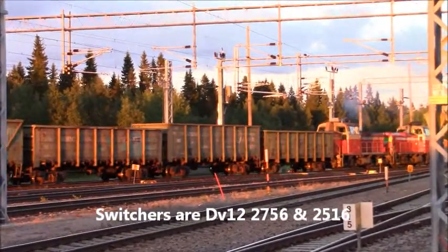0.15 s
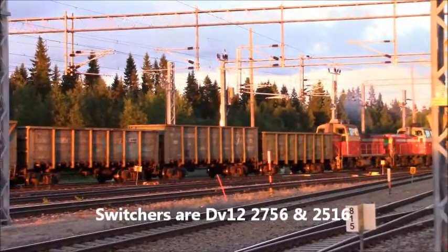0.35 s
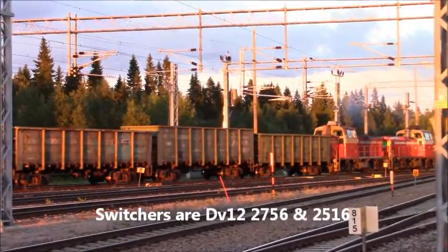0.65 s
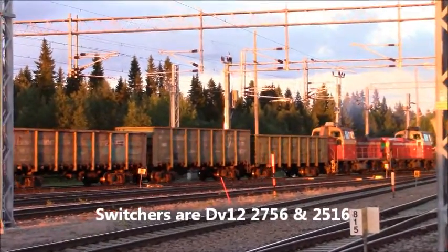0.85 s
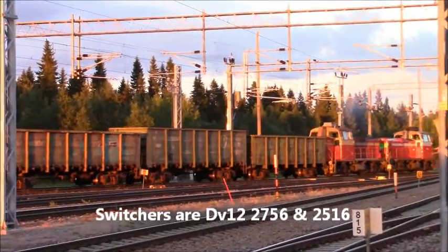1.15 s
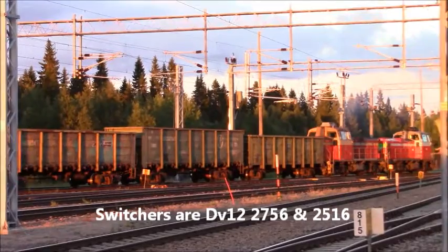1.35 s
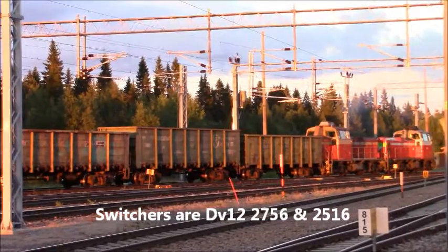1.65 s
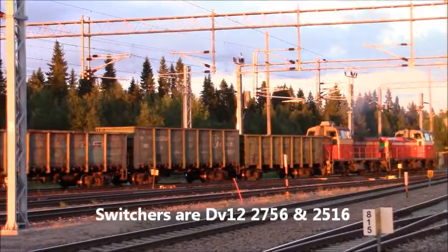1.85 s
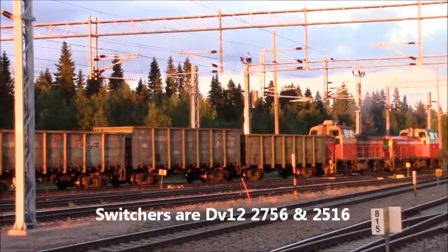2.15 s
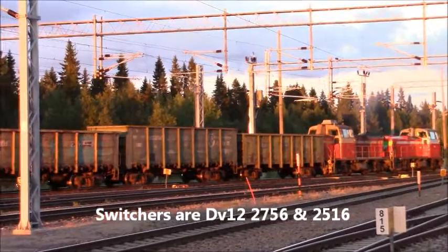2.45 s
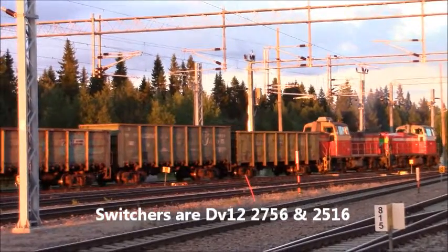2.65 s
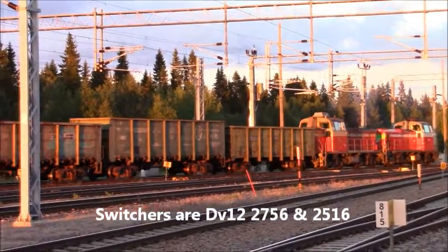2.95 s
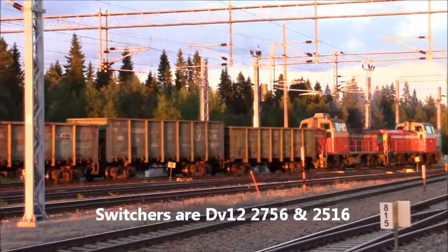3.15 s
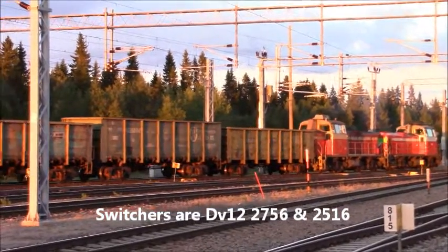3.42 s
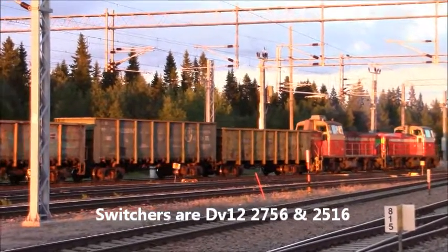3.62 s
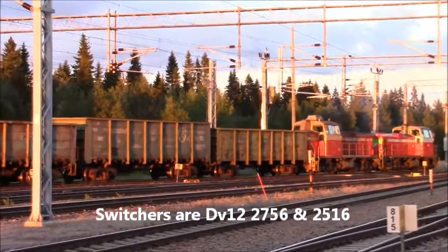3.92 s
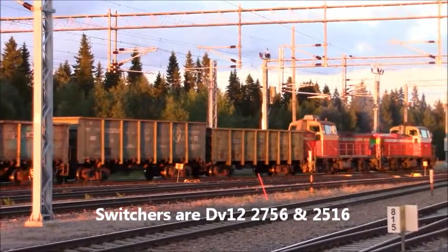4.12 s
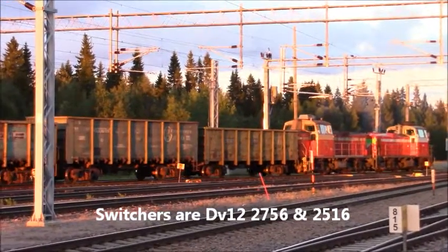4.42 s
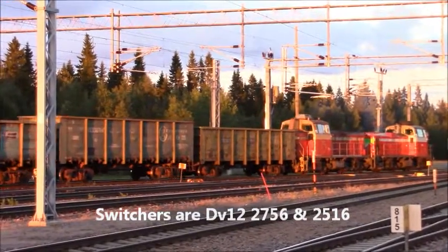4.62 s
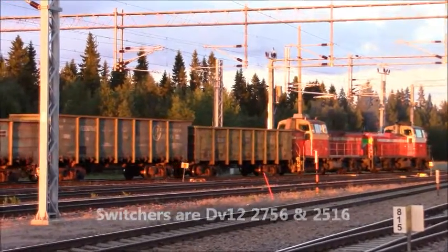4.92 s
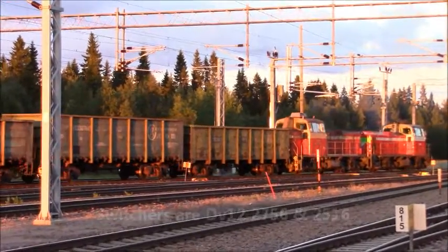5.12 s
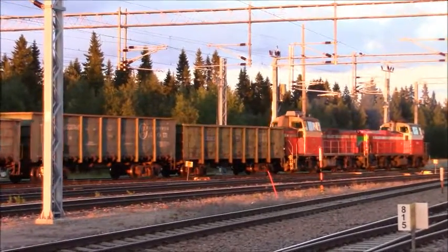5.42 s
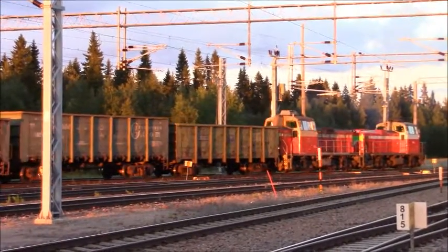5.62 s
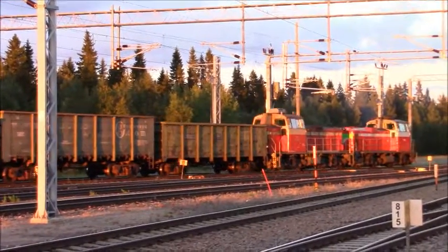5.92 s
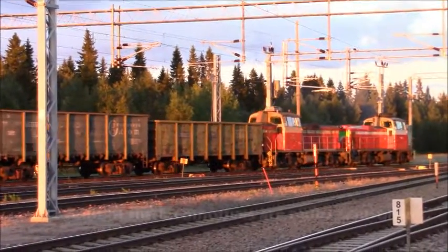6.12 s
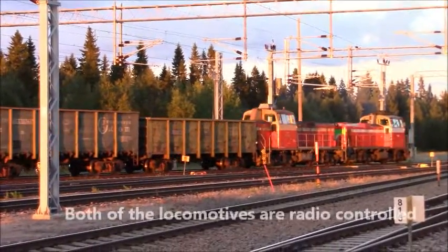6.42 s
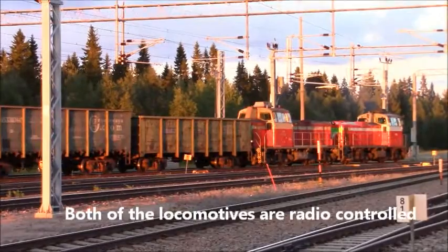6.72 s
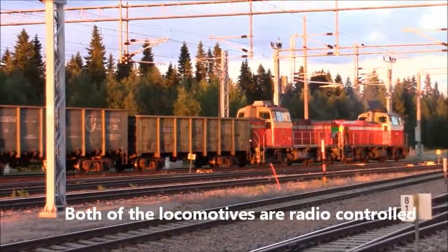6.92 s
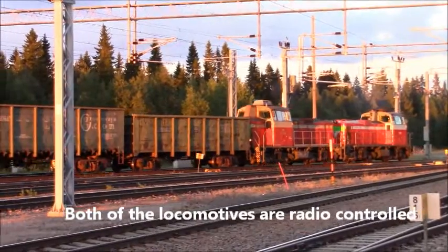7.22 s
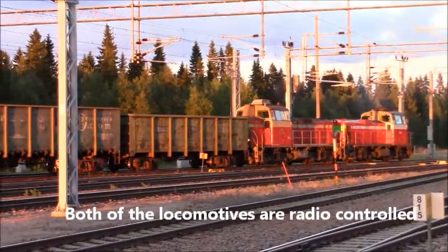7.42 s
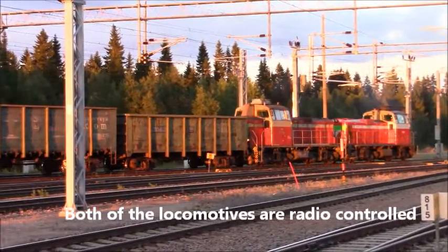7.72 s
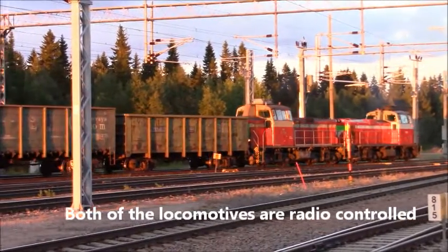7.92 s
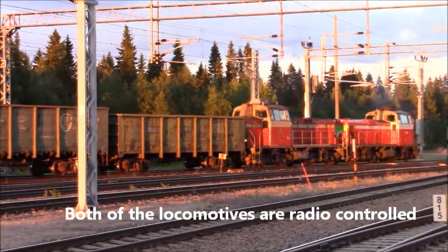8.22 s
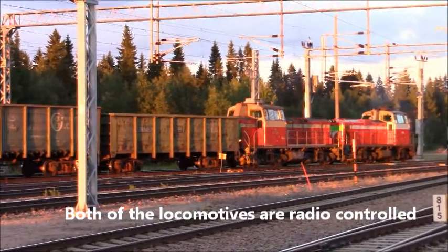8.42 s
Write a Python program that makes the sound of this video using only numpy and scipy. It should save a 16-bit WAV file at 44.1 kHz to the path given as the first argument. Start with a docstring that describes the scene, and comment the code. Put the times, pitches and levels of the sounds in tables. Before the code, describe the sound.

A slow freight train rumbles and clanks through a rail yard while its wheels sing long, piercing high squeals that push the rumble down.

```python
"""A rail yard: a slow freight train is pushed through the curves, with a diesel throbbing far off.
Coloured noise makes the wagons rumble and scrape; short noise bursts are their clanks and thuds.
Wheels creep sideways and sing as spread tones; one screeches in many modes, flanges ring and hiss.
A fast limiter pushes the rumble down whenever a squeal swells."""
import sys
import numpy as np
from scipy.fft import rfft, irfft, next_fast_len
from scipy.io import wavfile
from scipy.ndimage import uniform_filter1d, minimum_filter1d, map_coordinates

SR = 44100
rng = np.random.default_rng(int(sys.argv[2]) if len(sys.argv) > 2 else 0)


def master(y):
    """Save y as 16-bit WAV."""
    cut = np.clip(np.atleast_2d(y).T, -1, 1)
    pcm = np.round(cut * 32767)  # scale
    wavfile.write(sys.argv[1], SR, pcm.astype(np.int16))


N = 377496
TOP_HZ = 15600  # upper band limit

# noise colour of the wagon bodies: (frequency [Hz], density [dB per Hz])
RUMBLE_SPECTRUM = [(15, -69), (25, -36), (41, -23), (59, -5), (75, -4), (112, -9), (150, -4.5), (195, 2),
                   (280, -2.5), (350, -8), (450, -11.5), (600, -37.5), (1000, -100)]
# noise colour of the wheels: (frequency [Hz], density [dB per Hz])
ROAR_SPECTRUM = [(250, -16.5), (400, -7.5), (520, -1), (720, 2.5), (850, -1.5), (940, -1), (1100, -6),
                 (1400, -5.5), (1680, -3), (2100, -7.5), (2900, -7), (3600, -17), (4500, -50)]
# noise colour of the rails: (frequency [Hz], density [dB per Hz])
HISS_SPECTRUM = [(2500, -16), (3400, 5.5), (4000, 5.5), (4500, -1), (5500, -2), (7300, -2), (8500, -8.5),
                 (10000, -18), (13000, -30), (15500, -27.5)]


def amp(db):
    """Decibels to gain."""
    return 10 ** (np.asarray(db) / 20)


def unit(x):
    """Scale to rms 1."""
    return x / np.sqrt(np.mean(np.abs(x) ** 2) + 1e-20)


def along(points, hz):
    """Read (Hz, value) points on a log frequency axis."""
    f, v = np.transpose(points)
    return np.interp(np.log(hz + 1), np.log(f + 1), v)


def curves(rows, t):
    """Each column after the time, read at the times t."""
    s, *cols = np.transpose(rows)
    return [np.interp(t, s, c) for c in cols]


def span(start_s, end_s):
    """The sample times between two moments."""
    return np.arange(max(0, int(start_s * SR)), min(N, int(end_s * SR))) / SR


def add(out, t, x):
    """Mix x into out at the times t."""
    out[..., round(t[0] * SR):][..., :len(t)] += x


def wobble(t, rate_hz):
    """A random curve with rate_hz knots a second, joined by cubic splines."""
    knots = rng.standard_normal(int(N * rate_hz / SR) + 4)
    coarse = t[::32]
    return np.interp(t, coarse, map_coordinates(knots, [coarse * rate_hz], mode="nearest"))


def filtered(x, response):
    """Multiply the spectrum of x by a response of frequency."""
    m = next_fast_len(N + SR // 10, True)
    return irfft(rfft(x, m) * response(np.fft.rfftfreq(m, 1 / SR)), m)[..., :N]


def ports(pair, side_db):
    """Left and right: a shared signal plus and minus a second, weaker one."""
    mid, side = pair[0], amp(side_db) * pair[1]
    return np.array([mid + side, mid - side])


def rush(spectrum, side_db):
    """Stereo noise of rms 1 with the given colour."""
    noise = filtered(rng.standard_normal((2, N)), lambda hz: amp(along(spectrum, hz)))
    return unit(ports(noise, side_db))


def scatter(t, width_hz, steady):
    """Complex gain of a tone over many moving paths: a steady share of the power, the rest fading."""
    grid_hz = 4000
    age = t - t[0]
    hz = np.fft.fftfreq(2 ** int(np.ceil(np.log2((age[-1] + 1) * grid_hz))), 1 / grid_hz)
    line_shape = 1 / (1 + (hz / width_hz) ** 2) / np.sqrt(1 + (hz / (5.1 * width_hz)) ** 2)
    white = rng.standard_normal((2, len(hz), 2)) @ [1, 1j]
    paths = unit(np.fft.ifft(np.fft.fft(white) * line_shape))
    steady = np.clip(steady, 0, 1)
    gain = np.sqrt(steady) + np.sqrt(1 - steady) * ports(paths, side_db=-14)
    return np.array([np.interp(age * grid_hz, np.arange(len(hz)), g) for g in gain])


def tone(t, cycles, width_hz, steady):
    """A fading sine of nominal rms 1 that follows a running count of cycles."""
    return np.sqrt(2) * np.real(scatter(t, width_hz, steady) * np.exp(2j * np.pi * cycles))


def swell(t, rise_s, t60_s, hold_s=0, growth=1):
    """An envelope that grows as a power of time, holds, then decays exponentially."""
    age = t - t[0]
    ringing_s = np.maximum(age - rise_s - hold_s, 0)
    return np.minimum(age / rise_s, 1) ** growth * amp(-60 * ringing_s / t60_s)


def diesel():
    """The firing note of distant locomotives and its third harmonic, mono."""
    # (time [s], firing rate [Hz], level [dB])
    firing = [(0, 78.05, -40), (0.7, 75.34, -38.5), (1.3, 76.94, -49), (2.1, 71.7, -44), (2.6, 73.1, -54),
              (4.5, 67.83, -47), (8.56, 70.1, -52)]
    t = np.arange(N) / SR
    hz, db = curves(firing, t)
    cycles = np.cumsum(hz) / SR
    note = tone(t, cycles, width_hz=4, steady=0.89)
    third = tone(t, 3 * cycles, width_hz=6, steady=0.93)
    return amp(db) * (note + amp(-1) * third).mean(axis=0)


def rolling():
    """Rough treads shake wagon bodies, wheels and rails; treads scrubbing the rail lift roar and hiss."""
    # wagon rumble: (time [s], level [dB])
    roll = [(0, -28), (0.6, -34), (1.3, -33), (2.2, -34), (2.6, -31), (3.0, -36), (3.35, -32),
            (4.45, -30.5), (4.8, -35), (6.0, -32.5), (6.35, -37), (6.7, -33.5), (7.1, -38.5), (7.5, -31),
            (7.9, -33.5), (8.56, -38.5)]
    # scrubs, about two a second: (start [s], length [s], roar [dB], hiss [dB])
    scrapes = [(0.037, 0.91, -54, -47), (0.328, 0.24, -28, -47.5), (0.81, 0.25, -42.5, -47.5),
               (1.17, 0.29, -38, -45), (1.67, 0.37, -33.5, -43.5), (2.012, 0.2, -32, -42.5),
               (2.398, 0.44, -34.5, -42.5), (2.846, 0.2, -41, -43.5), (3.223, 0.36, -34, -48.5),
               (3.395, 0.27, -27.5, -47.5), (3.563, 0.52, -40.5, -42.5), (4.146, 0.33, -32, -41),
               (4.723, 0.33, -31, -41.5), (5.158, 0.21, -37, -43.5), (5.896, 0.36, -38, -37),
               (6.53, 0.54, -39.5, -38.5), (7.328, 0.48, -36, -40.5), (8.061, 0.65, -36.5, -41.5)]
    roar_rel_db, hiss_rel_db = -1.5, -16  # between scrapes, relative to the rumble
    skew = 0.65  # under 1, a scrape rises faster than it falls
    t = np.arange(N) / SR
    roll_db, = curves(roll, t)
    roar_power = amp(roll_db + roar_rel_db) ** 2
    hiss_power = amp(roll_db + hiss_rel_db) ** 2
    for s, length_s, roar_db, hiss_db in scrapes:
        during = span(s, s + length_s)
        arch = np.sin(np.pi * ((during - during[0]) / length_s) ** skew)
        add(roar_power, during, (amp(roar_db) * arch) ** 2)
        add(hiss_power, during, (amp(hiss_db) * arch) ** 2)
    rattle = wobble(t, 35)  # shared level flutter of roar and hiss
    rumble = amp(roll_db + 1.5 * wobble(t, 16)) * rush(RUMBLE_SPECTRUM, side_db=-33.5)
    roar = np.sqrt(roar_power) * amp(1.6 * rattle) * rush(ROAR_SPECTRUM, side_db=-30.5)
    hiss_gain = np.sqrt(hiss_power) * amp(1.4 * rattle + 1.2 * wobble(t, 90))
    hiss = hiss_gain * rush(HISS_SPECTRUM, side_db=-24)
    return rumble + roar + hiss


def knocks():
    """Blows clank in the running gear and thud in the empty wagons; lighter ones fall at random."""
    # wheels over joints, couplers taking up slack: (time [s], clank [dB], thud [dB])
    blows = [(.16, -25.5, -21.5), (.35, -23.5, -37.5), (.42, -28.5, -40), (.713, -41.5, -39),
             (2.063, -28, -23.5), (2.1, -25.5, -36), (2.268, -30.5, -25), (3.123, -34.5, -41),
             (3.455, -25, -38), (3.52, -30, -28), (4.083, -32.5, -40.5), (4.28, -27, -30),
             (4.704, -26, -43), (4.77, -24, -38), (6.023, -31, -31.5), (6.556, -24.5, -25),
             (7.34, -24, -42), (7.744, -23, -29.5), (8.093, -19.5, -25.5), (8.485, -29, -30.5)]
    clank, thud = np.zeros(N), np.zeros(N)
    light = [(when * (N / SR - .1), -38 + 6 * force, -38 + 6 * weight)
             for when, force, weight in rng.random(size=(36, 3))]
    for s, clank_db, thud_db in [*blows, *light]:
        t = span(s, s + .4)
        add(clank, t, amp(clank_db) * swell(t, rise_s=0.0063, t60_s=0.13))
        add(thud, t, amp(thud_db) * swell(t, rise_s=0.0071, t60_s=.22))
    gear = rush(ROAR_SPECTRUM, side_db=-27.5) + amp(-16.5) * rush(HISS_SPECTRUM, side_db=-14.5)
    return clank * gear + thud * rush(RUMBLE_SPECTRUM, side_db=-36.0)


def squeaks():
    """Here and there a tread or a spring squeaks and rings out as one spread tone."""
    # (time [s], pitch [Hz], level [dB], rise [s], t60 [s], line width [Hz])
    chirps = [(0, 3990, -39.5, 0.0068, 1.3, 87), (0.38, 7250, -51, 0.063, 0.48, 60),
              (0.722, 7800, -55, .04, 0.3, 69), (1.88, 6200, -50, 0.03, .8, 30),
              (1.88, 7200, -51, 0.03, .6, 21.3), (1.83, 3610, -34.5, 0.5, 1.6, 7.3),
              (2.1, 8620, -58.5, 0.076, 1.2, 27), (3.662, 10240, -49, 0.012, 0.22, 100),
              (4.699, 1340, -29, .012, 0.13, 17), (4.699, 2860, -37, 0.037, 0.44, 200),
              (4.8, 7460, -46, 0.11, 1.45, 5.5), (5.18, 6330, -37, 0.064, 0.12, 28),
              (5.38, 2665, -32.5, .045, .2, 270), (5.38, 5540, -41, 0.048, 0.18, 400),
              (5.93, 4850, -27, 0.042, 0.66, 23), (6.529, 762, -37.5, 0.16, 1.5, 10),
              (7.131, 916, -35.5, 0.044, 0.59, 12), (7.13, 1640, -36.5, 0.034, 1, 19),
              (7.13, 6000, -41, 0.036, 0.5, 15), (7.77, 1645, -36.5, 0.022, 0.78, 19)]
    out = np.zeros((2, N))
    for s, hz, db, rise_s, t60_s, width_hz in chirps:
        t = span(s, s + 1)
        add(out, t, amp(db) * swell(t, rise_s, t60_s) * tone(t, hz * t, width_hz, steady=.1))
    return out


def flanges():
    """Flanges grazing the rail hiss and ring high modes, a few strong ones among many faint ones."""
    # (time [s], rise [s], ring t60 [s], ring [dB], hiss [dB], pitch ratio of the strong modes)
    grazes = [(0.8, 0.099, 1.4, -52.5, -56, 1.035), (1.732, 0.017, .5, -65, -53, .96),
              (4.7, .06, 2, -51, -56, 1.005), (5.18, 0.025, 0.42, -68, -54, 1.1),
              (5.554, 0.014, 1, -42, -39, 1), (7.135, .04, .6, -44, -51, .92)]
    # strong modes: (frequency [Hz], level [dB])
    strong_modes = [(5728, -7), (6616, -1.5), (6700, -8.5), (7343, -1), (7640, -8.5), (8662, -5.5),
                    (9415, -11), (9750, -14), (10444, -7), (11364, -12), (11640, -16), (12450, -17),
                    (12839, -16), (13550, -10), (13991, -20)]
    # (frequency [Hz], density [dB per Hz])
    hiss_spectrum = [(2000, -15), (3500, 4.5), (7000, -5.5), (10000, -3), (14300, -17.5), (15500, -35)]
    out, hiss = np.zeros((2, N)), rush(hiss_spectrum, side_db=-14)
    for s, rise_s, t60_s, ring_db, hiss_db, ratio in grazes:
        t = span(s, s + 1)
        ring = sum(amp(db) * tone(t, ratio * hz * t, width_hz=7.4, steady=0.44)
                   for hz, db in strong_modes)
        for hz in rng.uniform(5500, 15000, size=40):
            ring += amp(-11.0 + along(hiss_spectrum, hz)) * np.sin(2 * np.pi * hz * t)
        add(out, t, amp(ring_db) * swell(t, rise_s, t60_s) * ring)
        hiss_part = hiss[:, round(t[0] * SR):][:, :len(t)]
        add(out, t, amp(hiss_db) * swell(t, rise_s, t60_s * .5) * hiss_part)
    return out


def screech():
    """A wheel breaks loose in many modes, one soon after another; the high ones die away sooner."""
    # (frequency [Hz], level [dB], late entry [s])
    wheel_modes = [(930, -21, 0.016), (1680, -37, 0), (2140, -42, 0.02), (2519, -35, 0), (2660, -35, 0.015),
                   (2840, -44, 0.02), (3413, -21.5, 0.042), (3677, -44, 0.01), (4344, -25, 0),
                   (5276, -25.5, 0.004), (6196, -31, 0), (7165, -28.5, 0.015), (8096, -29.5, 0.012),
                   (9055, -33.5, 0), (9087, -35.5, 0), (10018, -38, 0.012), (10051, -41, 0.012),
                   (11025, -41.5, 0), (11633, -51, 0), (11956, -42, 0.012), (11999, -36.5, 0.012),
                   (12931, -32, 0.004), (12974, -40, 0.004), (13943, -43, 0.028), (14863, -48, 0.012)]
    start_s, rise_s, hold_s, t60_s = 5.553, 0.058, 0.019, 1.06
    gain_db, halo_db = -0.5, -14
    damp_db_per_s = 29  # extra decay at TOP_HZ, in proportion below
    out = np.zeros((2, N))
    for hz, mode_db, late_s in wheel_modes:
        s = start_s + late_s
        t = span(s, s + t60_s)
        ringing_s = np.maximum(t - s - rise_s - hold_s, 0)
        level = amp(gain_db + mode_db - damp_db_per_s * ringing_s * hz / TOP_HZ)
        # a sharp line with a rough halo from the slipping contact
        line = tone(t, hz * t, width_hz=4 + hz * 0.0041, steady=0.72)
        halo = tone(t, hz * t, width_hz=12 + hz * 0.0055, steady=0)
        envelope = swell(t, rise_s, t60_s, hold_s, growth=0.53)
        add(out, t, level * envelope * (line + amp(halo_db) * halo))
    return out


def squeals():
    """Stick-slip keeps a wheel mode singing: it grows, sags, rings out; harder slip lifts overtones."""
    # lower mode near 2100 Hz or upper one near 2700 Hz: (start [s], rise [s], hold [s], t60 [s],
    # level [dB], sag [dB per s], pitch [Hz], steady power share [0-1], overtones [dB])
    songs = [(0, 0.0034, 0.065, 0.78, -15, 4, 2104, 0.3, -3.5),
             (0, 0.0086, 0.24, 1.6, -35, 11, 2690, 0.3, -14),
             (0.149, 0.15, 0.55, 1.95, -23.5, 12.5, 2095, 0.35, -2),
             (0.729, 0.11, 0.035, 0.4, -18, 4, 2110, 0.73, 0),
             (1.68, 0.35, 0.67, 1.7, -33, 3.5, 2124, 0.43, -2),
             (1.73, 0.66, 0.36, 1.57, -4, -4, 2698, 0.44, -2.5),
             (3.192, 0.25, 0.24, 1.04, -22.5, 1.5, 2647, 0.58, 1),
             (3.727, 0.21, 0.46, 0.65, -13.5, 5.5, 2657, 0.54, -5.5),
             (4.455, 0.16, 0.22, 1.96, -28, 7, 2668, 0.6, -1),
             (5.787, 0.13, 0.011, 0.74, -8.5, 6.5, 2179, 0.84, -1.5),
             (5.777, 0.13, 0.07, 0.7, -17.5, 3.5, 2747, 0.3, -5),
             (5.93, 0.3, 0.79, 0.49, 6, 15.5, 2719, 0.72, -3.5),
             (6.181, 0.33, 0.63, 0.82, -2, 0, 2615, 0.58, 0.5),
             (6.298, 0.21, 0.5, 1.7, -37, -1, 2070, 0.4, -6),
             (6.978, 0.27, 0.28, 1.1, 5.5, 13.5, 2617, 0.5, 5),
             (7.449, 0.15, 0.5, 2.2, 1, 0, 2615, 0.32, -1.5),
             (7.727, 0.09, 0.83, 1.4, -33, 7.5, 2084, 0.5, -1)]
    # overtones from twice the pitch upward: level [dB]
    overtones = [-31.5, -39, -58.5, -57, -64]
    growth = 1.75  # build-up as this power of time
    width_hz, flutter_hz, drift_hz = 20.7, 1.8, 3.034  # path spread; quick, slow pitch change
    bright_db_per_db = 0.11  # extra overtone growth with the squeal
    out = np.zeros((2, N))
    for s, rise_s, hold_s, t60_s, db, sag, hz, steady, bright_db in songs:
        t = span(s, s + rise_s + hold_s + t60_s)
        sagging_db = db - sag * np.clip(t - s - rise_s, 0, hold_s)
        level = amp(sagging_db) * swell(t, rise_s, t60_s, hold_s, growth)
        pitch_hz = hz + flutter_hz * wobble(t, 25) + drift_hz * wobble(t, 3)
        cycles = np.cumsum(pitch_hz) / SR
        hardness = amp(bright_db) * level ** bright_db_per_db
        voice = tone(t, cycles, width_hz, steady)
        for k, overtone_db in enumerate(overtones, 2):
            overtone = tone(t, k * cycles, width_hz * k * 0.91, steady=0.13)
            voice += hardness * amp(overtone_db) * overtone
        add(out, t, level * voice)
    return out


def scene():
    """All wheels over the rolling train and the far diesel."""
    return diesel() + rolling() + knocks() + squeaks() + flanges() + screech() + squeals()


def limiter(x, ceiling_db, knee, release_db_per_s):
    """The gain falls at once on a peak and climbs back at a fixed rate in dB."""
    peak = -minimum_filter1d(-np.abs(x).max(axis=0), size=64)
    over_db = 20 * np.log10(1 + (peak / amp(ceiling_db)) ** knee) / knee
    ramp_db = release_db_per_s * np.arange(N) / SR
    held_db = np.maximum.accumulate(over_db + ramp_db) - ramp_db
    return x * amp(-uniform_filter1d(held_db, size=48))


def saturate(x, top, hardness):
    """After the limiter, the recorder rounds off the highest crests, which adds odd overtones."""
    return x / (1 + np.abs(x / top) ** hardness) ** (1 / hardness)


def record(dry):
    """Two close microphone ports, a fast limiter, slight overload and a band limit."""
    # port balance: (frequency [Hz], left minus right [dB])
    balance = [(100, 0.57), (1000, -0.57), (2100, 1.65), (2700, 1.2), (4400, 3), (8000, 0), (13000, 2.5)]
    left_lead_s = 1.05e-5  # the left port hears the train first
    sides = np.array([[1], [-1]]) / 2

    def port_response(hz):
        return amp(sides * along(balance, hz)) * np.exp(2j * np.pi * hz * sides * left_lead_s)

    def lowpass(hz):
        return 1 / np.sqrt(1 + (hz / TOP_HZ) ** 160)

    heard = filtered(dry, port_response)
    held = limiter(heard, ceiling_db=-6.5, knee=7.8, release_db_per_s=134.0)
    return filtered(saturate(held, top=0.47, hardness=5.06), lowpass)


dry = scene()
out = record(dry)
master(out)
```